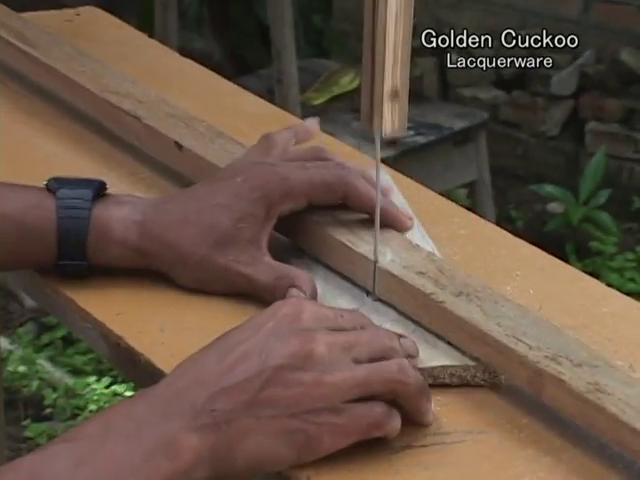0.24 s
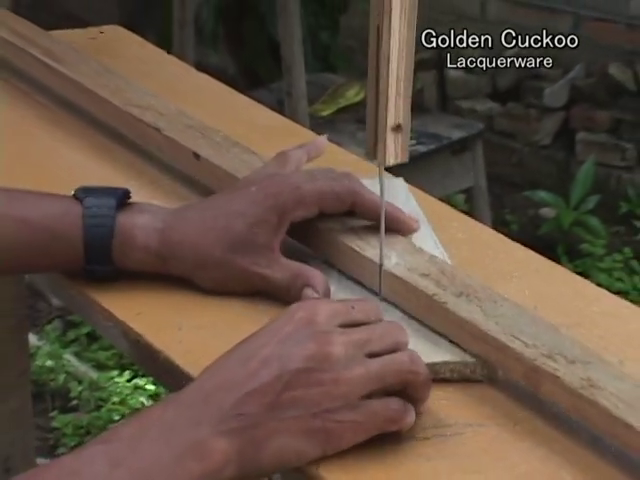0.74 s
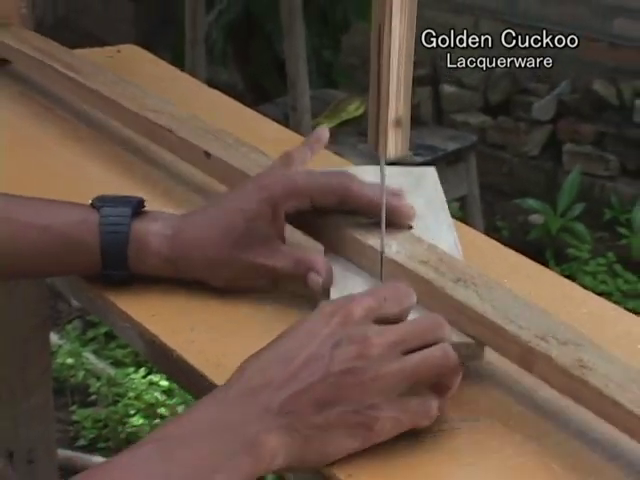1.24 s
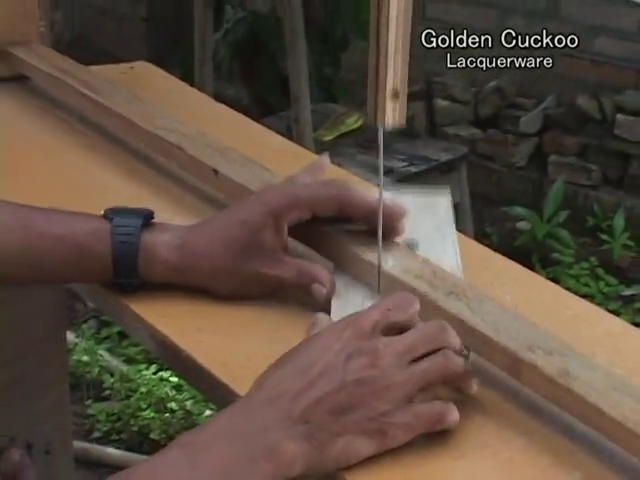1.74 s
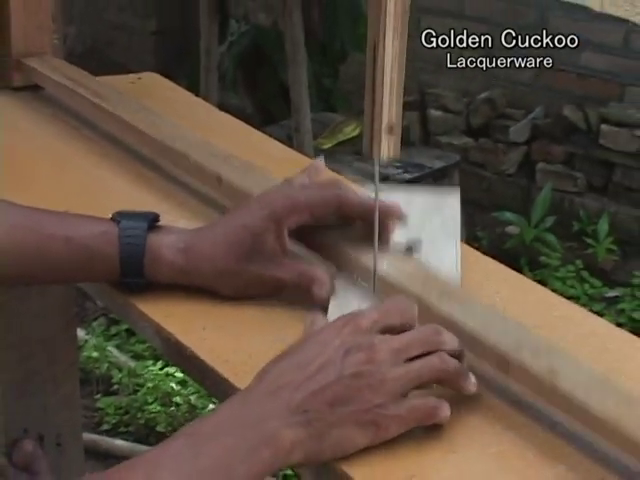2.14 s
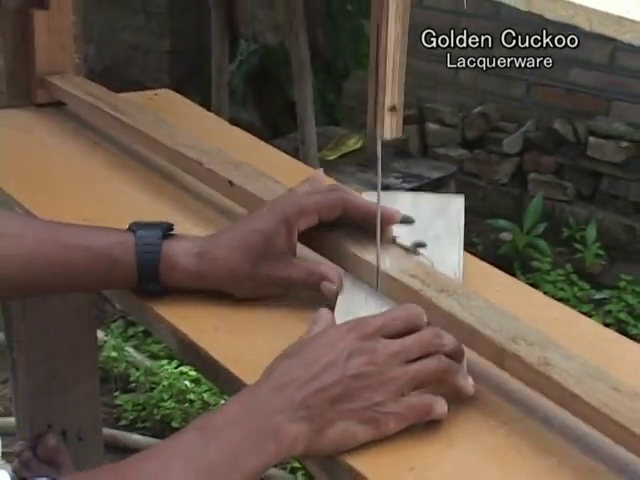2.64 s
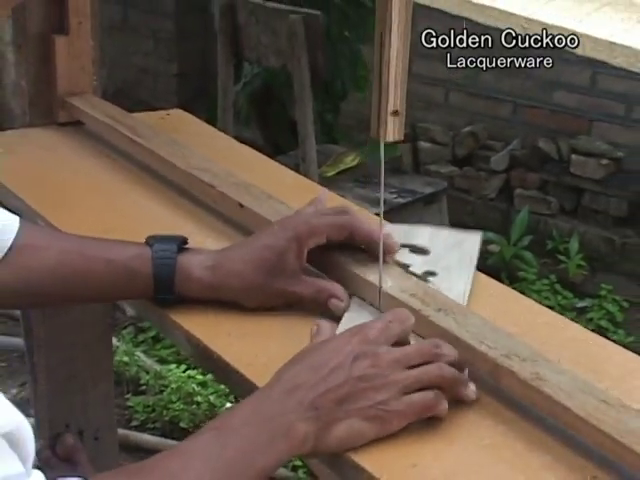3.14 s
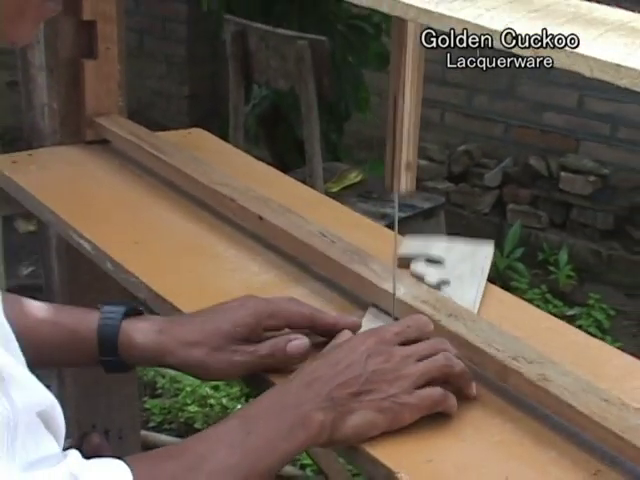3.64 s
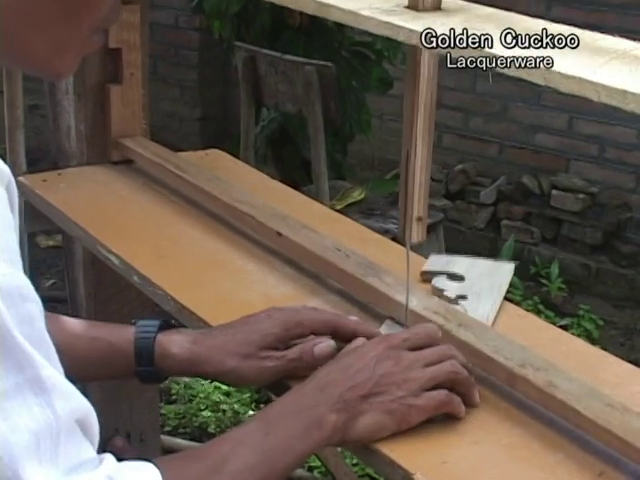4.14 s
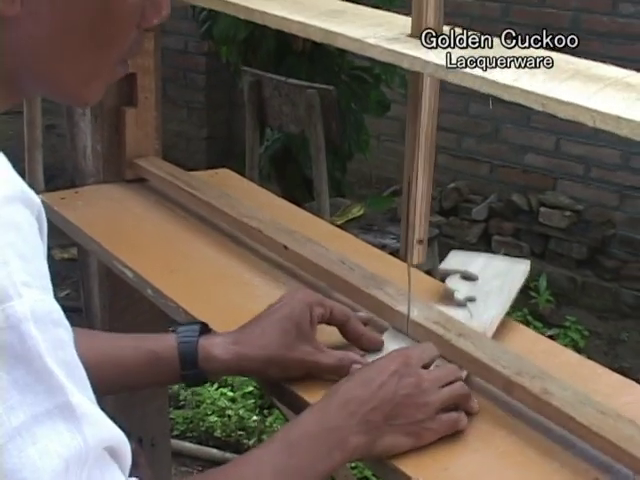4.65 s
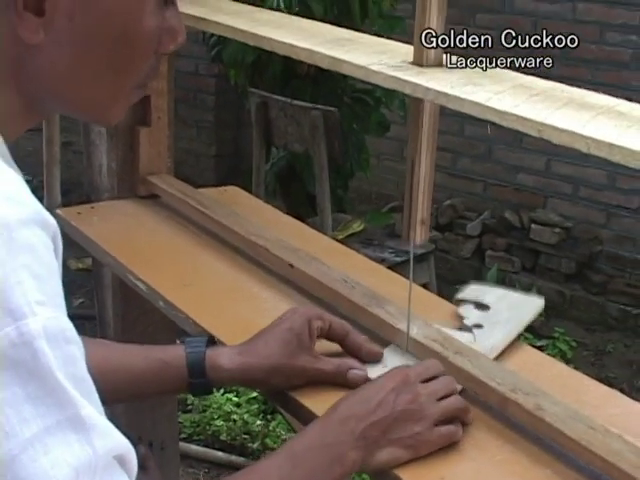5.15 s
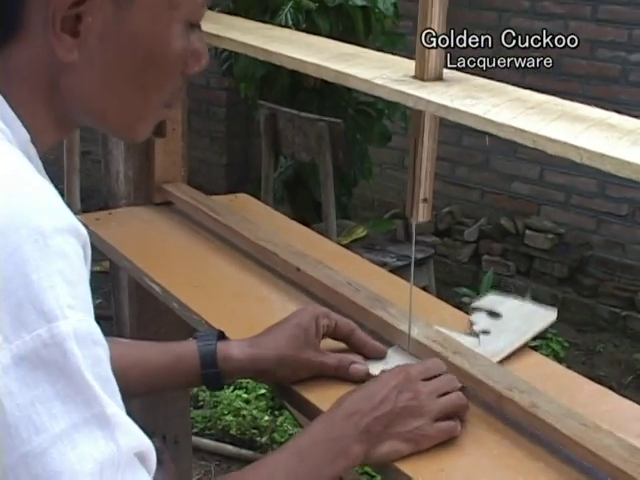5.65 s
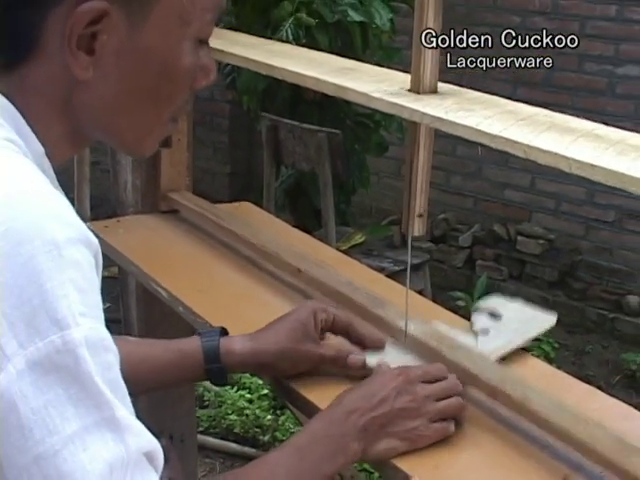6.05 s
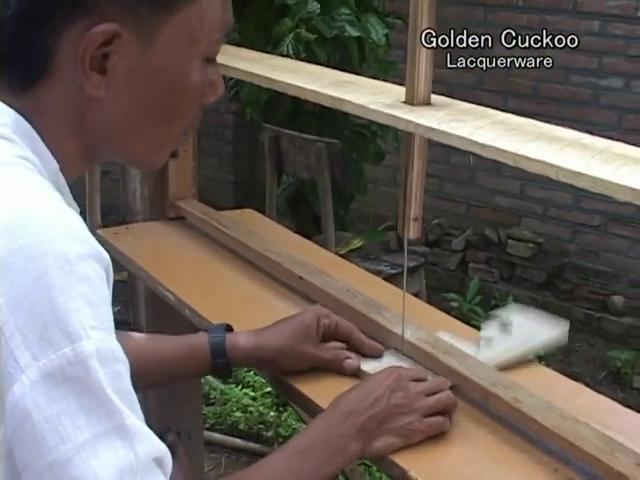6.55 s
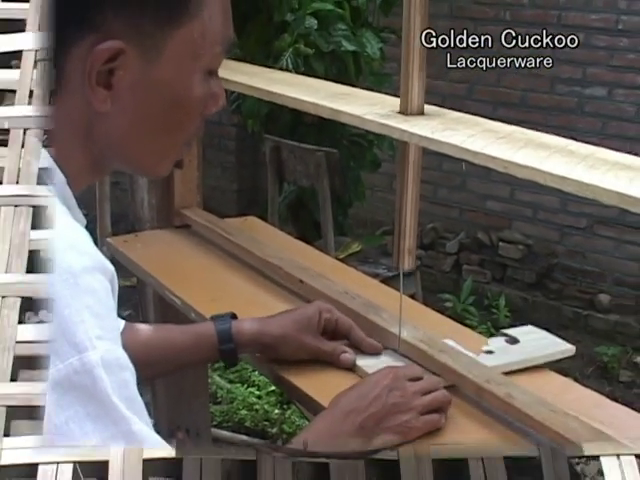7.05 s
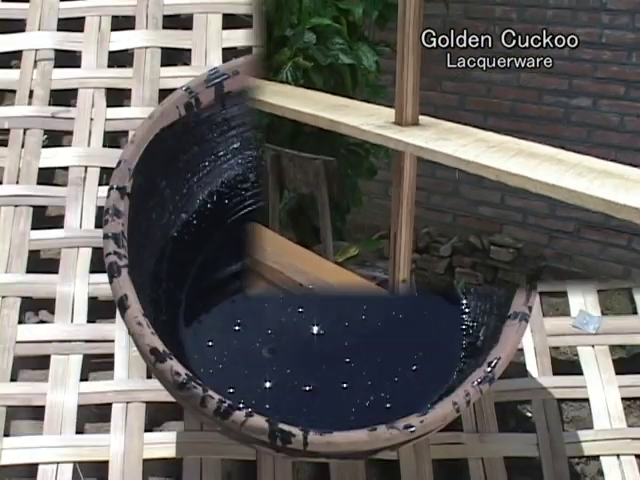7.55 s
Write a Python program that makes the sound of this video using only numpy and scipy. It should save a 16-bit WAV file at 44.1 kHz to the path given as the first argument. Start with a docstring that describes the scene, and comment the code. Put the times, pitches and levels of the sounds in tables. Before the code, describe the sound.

A slow rhythmic saw, over two strokes a second, grinds through thin wood outdoors while the loose board knocks and rattles on its table.

```python
"""Open yard: a wooden treadle scroll saw cuts a thin board close by, 2.4 strokes a second.
Down strokes: random tooth snaps, shaped by blade speed and feed, drive board, table and blade resonances.
Up strokes: friction noise slides lightly and swells in two rubs. Knocks: the lifted board clacks on the hold-down
bar or drops on the table, as noise cracks, decaying wood modes and thuds. Snags twang the blade; one squeak.
Behind: short scattered reflections, filtered yard noise and low air rumble, with a faint stereo spread."""
import sys
import numpy as np
from scipy import signal
from scipy.fft import rfft, irfft
from scipy.io import wavfile
from scipy.ndimage import uniform_filter1d, minimum_filter1d, map_coordinates

SR = 44100
rng = np.random.default_rng(int(sys.argv[2]) if len(sys.argv) > 2 else 0)


def unload_audio(sound):
    """Save the sound as a 16-bit wav file, at the path given as the first command line argument."""
    columns = np.transpose(np.atleast_2d(sound))
    # keep every value between -1 and 1, then stretch to whole-number steps
    steps = np.round(np.clip(columns, -1, 1) * 32767)
    wavfile.write(sys.argv[1], SR, steps.astype(np.int16))


N = 343873
T = np.arange(N) / SR  # s

# Down strokes: start_s, rise_s, force_db (relative)
DOWN_STROKES = [(.026, 0.014, -28.5), (.452, 0.012, -26), (0.88, 0.017, -26.5), (1.306, 0.0076, -25),
                (1.743, 0.039, -22.5), (2.173, 0.041, -22.5), (2.611, 0.024, -23), (3.03, 0.037, -24.5),
                (3.447, 0.057, -25.5), (3.885, 0.03, -27.5), (4.302, 0.072, -25.5), (4.75, 0.028, -28.5),
                (5.173, 0.022, -28), (5.58, 0.048, -26.5), (5.974, 0.067, -28), (6.4, 0.069, -27),
                (6.835, 0.047, -28), (7.254, 0.03, -31), (7.7, .025, -33.5)]
# Up strokes: first_rub_s, rub_spread_s (Gaussian sigma), sway_s (delay to second rub), force_db (relative)
UP_STROKES = [(0.283, 0.024, 0.071, -26), (.738, 0.014, 0.077, -23.5), (1.15, 0.015, .092, -22.5),
              (1.586, 0.015, 0.092, -23), (2.022, 0.011, 0.1, -20), (2.46, 0.016, .1, -22.5),
              (2.885, 0.022, 0.099, -25), (3.297, 0.019, 0.063, -26.5), (3.716, 0.015, 0.077, -25),
              (4.143, 0.021, .091, -28), (4.577, .019, 0.088, -26.5), (5.01, .016, 0.084, -25.5),
              (5.432, 0.021, 0.084, -25), (5.841, .014, 0.099, -21.5), (6.263, 0.013, 0.089, -22.5),
              (6.676, 0.0098, 0.085, -25.5), (7.111, .011, 0.09, -27.5), (7.539, 0.01, 0.075, -26.5)]
# Board knocks, bright clacks on the bar, dull drops on the table:
# start_s, strength_db (relative), table_thud_db (relative)
BOARD_KNOCKS = [(.2312, -17.5, -44), (0.241, -22.5, -46), (0.685, -40, -42), (1.085, -30.5, -36.5),
                (2.066, -36.5, -48), (2.512, -31, -42), (2.8276, -26, -36.5), (3.247, -20.5, -47),
                (3.373, -58, -25.5), (3.6618, -20, -39), (4.0966, -14.5, -41), (4.148, -30, -25),
                (4.1941, -11.5, -33), (4.235, -15, -18.5), (4.5264, -25.5, -45), (4.6236, -7, -38),
                (4.6336, -16, -33), (4.715, -51, -35), (4.9628, -14, -39), (5.05, -29.5, -39),
                (5.138, -52, -31.5), (5.3836, -15.5, -36), (5.793, -33.5, -32), (5.8776, -24.5, -29),
                (6.2105, -15, -34.5), (6.624, -24.5, -33.5), (7.0537, -15, -34), (7.585, -26, -54)]
# Tooth snags: start_s, strength_db (relative)
TOOTH_SNAGS = [(0.462, -22.5), (0.4645, -12.5), (.504, -21), (0.5339, -17.5), (.8939, -19), (1.325, -27),
               (1.7606, -27.5), (1.785, -20), (1.8216, -22), (2.1978, -14.5), (2.2434, -19.5),
               (2.2767, -17), (2.2894, -17), (2.313, -24), (2.3413, -16.5), (2.629, -13), (3.0554, -16.5),
               (3.9326, -19)]
# Stick-slip squeak: centre_s, spread_s (Gaussian sigma), pitch_hz, level_db
STICK_SLIP = (5.342, .008, 3650, -35)
# Blade seat in the kerf as the board is turned: time_s, low_modes_db, side_whine_db, rub_hiss_db
KERF_SEAT = [(0, -6, -47, -25), (1.1, -3.5, -56, -13), (2.3, -2, -66, -32), (3.3, -6, -22, -10.5),
             (4.4, -10, -11.5, -9), (5.25, -21, -4.5, -8.5), (6.1, -6, -9, -10.5), (6.9, -2.5, 0, 3.5),
             (7.8, -1.5, -1, -5.5)]
# Board slackness; one hand lets go of the far end: time_s, slack (0-1)
BOARD_SLACK = [(0, 0.04), (.5, 0), (3.05, 0.14), (3.45, 1), (5.9, 0.64), (7.8, 0.56)]
# Table and board resonances: centre_hz, width_hz, boost_db
TABLE_PEAKS = [(243, 14, 7.5), (363.8, 46, 8), (415, 110, -4.5), (508, 29.6, 6), (655, 990, 5.5),
               (764, 80, -6.5), (843, 45, 8), (1054, 72, 2.5), (1240, 68, -1.5), (1463, 130, 6.5),
               (1767, 58, 6), (1980, 280, 4), (2250, 41, 3.5), (2690, 210, 12.5), (4350, 560, -0.5),
               (6270, 700, 22), (7970, 180, 23.5), (9760, 220, 17), (11330, 1700, 9.5), (13300, 270, 2)]
# Steel blade modes: centre_hz, width_hz, peak_db (relative)
BLADE_MODES = [(850, 50, -2), (2660, 190, 0), (2800, 150, -8), (4030, 220, -10), (5000, 300, -15),
               (12000, 250, -23), (13340, 200, -18)]
# Sideways modes of the blade twisted in the kerf: centre_hz, width_hz, peak_db (relative)
WHINE_MODES = [(1053, 41, 11), (4627, 86, 6), (5780, 290, -6)]
# Modes of struck board and bar: centre_hz, level_db (relative), t60_s
WOOD_MODES = [(878, -10.5, 0.072), (1121, -3.5, 0.055), (1345, -4.5, 0.053), (1472, -1, 0.044),
              (1632, 8, 0.024), (1844, 1.5, 0.039), (2073, 2.5, 0.043), (2390, 2, 0.036),
              (2670, 8.5, 0.013), (2875, 7, 0.022), (3200, -4, 0.033), (3600, -32, 0.0091),
              (3920, -8.5, 0.02), (4450, -19, 0.0083)]
# Spectra, all: frequency_hz, level_db (relative)
# Board pressed on the table
PRESSED_BOARD_COLOUR = [(20, -39), (70, -30.5), (135, -19.5), (170, -23), (215, -13), (260, -0.5), (350, 3),
                        (550, 2.5), (800, -6), (1100, -11), (1700, -13), (3000, -44.5), (8000, -43.5)]
# Board still loose
LOOSE_BOARD_COLOUR = [(60, -57), (180, -16), (300, 1.5), (600, 2), (850, 6.5), (1500, -10.5), (3000, -30),
                      (8000, -72)]
# Table under a light touch
LIGHT_TOUCH_COLOUR = [(20, -39), (70, -48), (140, -29), (200, -23.5), (280, 1.5), (360, -0.5), (600, 0),
                      (1000, 0), (1600, -7), (3000, -23.5), (8000, -61)]
# Teeth tearing wood
RASP_COLOUR = [(60, -65), (300, -28), (900, 3.5), (1500, -1.5), (2700, 4.5), (3500, 1), (4900, 0),
               (5700, -17), (7000, -37.5), (9000, -25.5), (13500, -12.5), (15500, -73)]
# Backs of the teeth rubbing
SCRAPE_COLOUR = [(60, -55), (250, -14), (700, -4), (1000, 5.5), (1400, 1.5), (2700, 6.5), (3600, 2),
                 (5000, -1), (6300, -44), (8000, -47), (13500, -10), (15500, -30)]
# Bright part of the rubs
HISS_COLOUR = [(200, -45), (2000, 4), (4500, 8.5), (5700, 2), (6400, -14), (7200, -19), (11000, -8),
               (14000, -13), (15500, -27)]
# Hard knock
CRACK_COLOUR = [(60, -49), (300, -41), (1200, -4), (2000, 1.5), (3100, 2.5), (4200, 2.5), (4900, -2.5),
                (5600, -17), (6300, -13), (7300, -27), (9000, -30), (11500, -16.5), (13500, -15),
                (15500, -34)]
# Yard background
YARD_COLOUR = [(20, 0), (40, -25), (80, -16.5), (140, -11.5), (170, -11), (300, 9.5), (500, -2.5),
               (1000, 0), (2700, -12.5), (6000, -12.5), (8000, -22), (13500, -22), (16000, -30)]
# Air moving over the microphones
RUMBLE_COLOUR = [(15, -12), (35, 29), (60, -25), (120, -32), (400, -60)]
# Colour of the faint side signal
SIDE_COLOUR_POINTS = [(300, -70), (1000, -58), (2000, 2), (5000, 14.5), (13000, 24)]
# Faint low-weighted noise in the side signal
SIDE_NOISE_COLOUR = [(20, 3), (60, -4), (150, -19), (1000, -27), (15000, -13)]

CUT_S, FALL_S = 0.21, 0.081  # down stroke, slowing at its bottom
SAG_DB, SLACK_SAG_DB = 6.5, 2  # feed fade over a stroke: board pressed down, board slack
RASP_DB, RASP_SLOPE, SLACK_RASP_DB = -32, 0.7, 3  # middling stroke, dB per dB of force, extra when slack
RUB_SPREAD_S, SWAY_LOSS_DB, SWAY_SHORTER = 0.016, 4.5, 0.74  # usual rub; second is weaker and shorter
RUB_BOARD_DB, SLACK_BOARD_DB = -40, 11.5  # board shake per rub, extra when slack
RING_DB, RING_SLOPE = -20.5, 0.41  # ring at 0 dB strength, dB per dB: harder blows crack more than they ring
TAP_DB, TAP_SPREAD_DB, TAP_THUD_DB = -53, 3, -44.5  # board settling between rubs
LAND_RISE_SHARE, LAND_DB, LAND_THUD_DB = 0.35, -20.5, -8  # board landing; levels relative to stroke force


def cutting(bite=1.19, judder_db=2, chatter_db=0.5, rasp_gain_db=-1, blade_gain_db=-2, entry_s=0.036, size=16000):
    """Down strokes: teeth bite, the board judders on the table, the rasp dies first as the blade slows."""
    out, on_blade, t = np.zeros(N), np.zeros(N), T[:size]
    judder = undb(judder_db * walk(70))
    chatter = undb(chatter_db * walk(260))
    tearing = np.pad(snaps(rate_hz=2000, scatter_db=2) * judder * chatter, (0, size))
    knocking = np.pad(snaps(rate_hz=800, scatter_db=1) * judder, (0, size))
    usual_db = np.mean(DOWN_STROKES, axis=0)[2]
    for start_s, rise_s, force_db in DOWN_STROKES:
        i = max(int(start_s * SR), 0)
        peaks = held()
        loose_hold = slack(start_s)
        sag_db = SAG_DB + (SLACK_SAG_DB - SAG_DB) * loose_hold
        edge_db = RASP_DB + RASP_SLOPE * (force_db - usual_db) + SLACK_RASP_DB * loose_hold
        rise = np.clip(t / max(rise_s, 0.004), 0, 1)
        fall = np.clip((CUT_S - t) / FALL_S, 0, 1) ** 1.28
        speed = rise * fall
        feed = undb(-sag_db * (np.clip(t / CUT_S, 0, 1) - 0.5))
        load = knocking[i:i + size] * undb(force_db) * speed * feed
        rasp = tearing[i:i + size] * undb(edge_db) * speed ** bite * np.sqrt(feed)
        # high rattle while loose, deeper once the teeth have pulled the board onto the table
        loose = np.exp(-(t / entry_s) ** 2)
        add(out, start_s, through(load * loose, response(LOOSE_BOARD_COLOUR, peaks)))
        add(out, start_s, through(load * np.sqrt(1 - loose), response(PRESSED_BOARD_COLOUR, peaks)))
        add(out, start_s, undb(rasp_gain_db) * through(rasp, response(RASP_COLOUR, peaks)))
        add(on_blade, start_s, rasp)
    return out + undb(blade_gain_db) * blade(on_blade)


def held(spread_db=2.28, detune=0.01):
    """Resonances for one stroke: the hands turn the board and damp it differently every time."""
    hz, width_hz, boost_db = np.transpose(TABLE_PEAKS)
    shift, lift = rng.standard_normal((2, len(TABLE_PEAKS)))
    return np.transpose([hz * (1 + detune * shift), width_hz, boost_db + spread_db * lift])


def slack(time_s):
    """Board slackness, 0-1, interpolated in time."""
    return np.interp(time_s, *np.transpose(BOARD_SLACK))


def returning(lag_s=0.015, linger=0.75, slide_db=-42, slide_board_db=-45,
              scrape_gain_db=-4, hiss_gain_db=-1, hiss_loss=0.33, blade_gain_db=-4):
    """Up strokes: tooth backs slide lightly and rub twice as the blade sways against the kerf."""
    slide = np.zeros(N)
    for (start_s, *_), (next_s, *_) in zip(DOWN_STROKES, DOWN_STROKES[1:]):
        turn_s = start_s + CUT_S
        slide += np.sin(np.pi * np.clip((T - turn_s) / (next_s - turn_s), 0, 1))
    scrape = undb(slide_db) * slide
    board = undb(slide_board_db) * slide
    hiss = np.zeros(N)
    seat_s, _, _, bright_db = np.transpose(KERF_SEAT)
    for first_s, spread_s, sway_s, force_db in UP_STROKES:
        # a short first rub leaves little sway for the second
        spent_db = SWAY_LOSS_DB * (RUB_SPREAD_S / spread_s) ** 2
        rubs = [(first_s, spread_s, 0), (first_s + sway_s, SWAY_SHORTER * spread_s, spent_db)]
        for rub_s, width_s, loss_db in rubs:
            press = swell(rub_s, width_s)
            scrape = np.maximum(scrape, undb(force_db - loss_db) * press)
            rub_hiss_db = force_db - hiss_loss * loss_db + np.interp(rub_s, seat_s, bright_db)
            hiss += undb(rub_hiss_db) * press
            # the heavy table answers later
            shake_db = RUB_BOARD_DB + SLACK_BOARD_DB * slack(rub_s)
            board = np.maximum(board, undb(shake_db) * swell(rub_s + lag_s, linger * width_s))
    catch = undb(1.9 * walk(260))
    friction = snaps(rate_hz=9000, scatter_db=4) * catch * scrape
    bright = snaps(rate_hz=12000, scatter_db=2) * catch * hiss
    shaking = snaps(rate_hz=2500, scatter_db=0.5) * board
    return (undb(scrape_gain_db) * through(friction, response(SCRAPE_COLOUR, TABLE_PEAKS))
            + undb(blade_gain_db) * blade(friction)
            + undb(hiss_gain_db) * through(bright, response(HISS_COLOUR, TABLE_PEAKS))
            + through(shaking, response(LIGHT_TOUCH_COLOUR, TABLE_PEAKS)))


def board_knocks(crack_gain_db=23, ring_gain_db=32, thud_gain_db=29, spread_db=3, build_s=0.0019, size=6000):
    """The lifted board clacks on the bar or drops on the table: crack, short wooden ring, table thud."""
    out, t = np.zeros(N), T[:size]
    crack, table = response(CRACK_COLOUR), response(LIGHT_TOUCH_COLOUR, TABLE_PEAKS)
    hz, mode_db, t60_s = np.transpose(WOOD_MODES)[:, :, None]
    # low bending waves travel slowly and build up late: each knock falls in pitch
    build = 1 - np.exp(-(t / build_s * hz / np.median(hz)) ** 2)
    for start_s, hit_db, low_db in [*BOARD_KNOCKS, *taps()]:
        # each blow lands on another spot and weights the modes anew
        weight, detune, phase = rng.standard_normal((3, len(WOOD_MODES), 1))
        decay = undb(mode_db + spread_db * weight - 60 * t / t60_s)
        tones = np.sin(2 * np.pi * (hz * (1 + 0.029 * detune) * t + phase))
        ring = (decay * tones * build).sum(axis=0)
        ring_db = RING_DB + RING_SLOPE * hit_db + ring_gain_db
        add(out, start_s, undb(ring_db) * ring / np.linalg.norm(ring))
        snap = signal.fftconvolve(contact(decay_s=0.0035), crack)
        add(out, start_s, undb(hit_db + crack_gain_db) * snap)
        thud = signal.fftconvolve(contact(decay_s=0.0087), table)
        add(out, start_s, undb(low_db + thud_gain_db) * thud)
    return out


def taps():
    """Light knocks as the teeth pull the board down and midway between rubs; rows as BOARD_KNOCKS."""
    luck_db = TAP_SPREAD_DB * rng.standard_normal(len(UP_STROKES))
    settling = [(first_s + sway_s / 2, TAP_DB + db, TAP_THUD_DB + db)
                for (first_s, _, sway_s, _), db in zip(UP_STROKES, luck_db)]
    landing = [(start_s + LAND_RISE_SHARE * rise_s, db + LAND_DB, db + LAND_THUD_DB)
               for start_s, rise_s, db in DOWN_STROKES]
    return settling + landing


def snags(twang_gain_db=21, crack_gain_db=18, thud_gain_db=22):
    """A tooth catches and lets go: the blade twangs, the board slaps the table."""
    twang, slap = np.zeros(N), np.zeros(N)
    for start_s, hit_db in TOOTH_SNAGS:
        add(twang, start_s, undb(hit_db) * contact(decay_s=0.0033))
        add(slap, start_s, undb(hit_db) * contact(decay_s=0.0073))
    return (undb(twang_gain_db) * blade(twang)
            + undb(crack_gain_db) * through(twang, response(CRACK_COLOUR))
            + undb(thud_gain_db) * through(slap, response(LIGHT_TOUCH_COLOUR, TABLE_PEAKS)))


def blade(force, sway_s=0.000293):
    """Blade ring under a force, low and sideways modes balanced by its seat in the kerf."""
    seat_s, low_db, side_db, _ = np.transpose(KERF_SEAT)
    low = through(force * undb(np.interp(T, seat_s, low_db)), blade_response(BLADE_MODES))
    whine = through(force * undb(np.interp(T, seat_s, side_db)), blade_response(WHINE_MODES))
    # tension changes as it is dragged through the wood: wandering delay bends the modes
    return map_coordinates(low + whine, [(T + sway_s * walk(25)) * SR], order=3)


def blade_response(modes, size=4096):
    """Unit-energy ring of the tensioned blade: decaying modes, damped by the wood around it."""
    t = T[:size]
    h = np.zeros(size)
    for hz, width_hz, db in modes:
        h += undb(db) * width_hz * np.exp(-np.pi * width_hz * t) * np.cos(2 * np.pi * hz * t)
    # so thin a blade radiates little bass
    h = signal.sosfilt(signal.butter(2, 500, "high", fs=SR, output="sos"), h)
    return h / np.linalg.norm(h)


def squeak(waver=0.015):
    """Stick-slip of the blade as it stops: a short tone of unsteady pitch."""
    centre_s, spread_s, hz, db = STICK_SLIP
    pitch_hz = hz * (1 + waver * walk(240))
    tone = unit(np.sin(2 * np.pi * np.cumsum(pitch_hz) / SR))
    return undb(db) * swell(centre_s, spread_s) * tone


def surroundings(x, t60_s=0.13, size=16000):
    """Short scatter off saw frame and yard wall: decaying noise tail, duller toward the top."""
    t = T[:size]
    tail = rng.standard_normal(size) * undb(-60 * t / t60_s) * (1 - np.exp(-t / 0.0058))
    tail = through(tail, response([(100, 1.5), (300, 0), (2500, -5), (6000, -5.5), (15000, -13.5)]))
    return through(x, tail / np.linalg.norm(tail))


def yard_noise(level_db=-49, drift_db=1.3):
    """Yard background: coloured noise with slow level drift."""
    return undb(level_db + drift_db * walk(7.2)) * through(rng.standard_normal(N), response(YARD_COLOUR))


def air_rumble(level_db=-75, gust_db=5):
    """Air moving over the microphones: low noise in gusts."""
    return undb(level_db + gust_db * walk(3.4)) * through(rng.standard_normal(N), response(RUMBLE_COLOUR))


def stereo_spread(mid, side_db=-20, noise_db=-71):
    """Faint side signal: scattered sound, mainly treble, plus low-weighted noise."""
    side = undb(side_db) * through(surroundings(mid, t60_s=0.035), response(SIDE_COLOUR_POINTS))
    return side + undb(noise_db) * through(rng.standard_normal(N), response(SIDE_NOISE_COLOUR))


def snaps(rate_hz, scatter_db):
    """Dense random snaps of uneven size, as teeth break or rub wood fibres; rms 1."""
    hit = rng.random(N) < rate_hz / SR
    size = undb(scatter_db * np.clip(rng.standard_normal(N), -2, 2))
    return unit(hit * size * rng.choice([-1, 1], N))


def contact(decay_s, size=2048):
    """Brief decaying chatter of wood on wood, unit energy."""
    force = rng.choice([-1, 1], size) * np.exp(-T[:size] / decay_s)
    return force / np.linalg.norm(force)


def swell(centre_s, spread_s):
    """Gaussian press, peak 1."""
    out = np.zeros(N)
    first = max(int((centre_s - 5 * spread_s) * SR), 0)
    near = slice(first, int((centre_s + 5 * spread_s) * SR))
    out[near] = np.exp(-0.5 * ((T[near] - centre_s) / spread_s) ** 2)
    return out


def response(points, peaks=(), size=4096):
    """Minimum-phase impulse response, unit energy, from a smooth colour plus resonances."""
    f = np.maximum(np.fft.rfftfreq(size, 1 / SR), 1)
    hz, db = np.transpose(points)
    db = np.interp(np.log(f), np.log(hz), db)
    for centre_hz, width_hz, boost_db in peaks:
        db = db + boost_db / (1 + (2 * (f - centre_hz) / width_hz) ** 2)
    # fold the cepstrum to make it causal
    cepstrum = irfft(np.log(undb(db)))
    cepstrum[1:size // 2] *= 2
    cepstrum[size // 2 + 1:] = 0
    h = irfft(np.exp(rfft(cepstrum)))
    return h / np.linalg.norm(h)


def through(x, h):
    """Pass a force through a body: convolution, input length kept."""
    return signal.fftconvolve(x, h)[:len(x)]


def walk(rate_hz):
    """Random drift, linear between rate_hz knots a second, rms near 1."""
    knots = rng.standard_normal(N // 20)
    return 1.396 * np.interp(T * rate_hz, np.arange(len(knots)), knots)


def add(track, start_s, sound):
    """Mix a sound into a track."""
    i = max(int(start_s * SR), 0)
    track[i:i + len(sound)] += sound[:N - i]


def undb(db):
    """Decibels to amplitude."""
    return 10 ** (np.asarray(db) / 20)


def unit(x):
    """Scale to rms 1."""
    return x / np.sqrt(np.mean(x ** 2))


def scene(wet_db=-20):
    """Saw straight ahead in the yard, with a faint stereo spread, mainly in the treble."""
    saw = cutting() + returning() + board_knocks() + snags() + squeak()
    mid = saw + undb(wet_db) * surroundings(saw) + yard_noise() + air_rumble()
    side = stereo_spread(mid)
    return np.array([mid + side, mid - side]) * undb([[-0.07], [0.07]])


def record(dry, ceiling=1.0, top_hz=14600):
    """A limiter holds down the hardest peaks; an elliptic low-pass cuts the top."""
    wanted = np.minimum(1, ceiling / (np.abs(dry).max(axis=0) + 1e-9))
    gain = uniform_filter1d(minimum_filter1d(wanted, size=65), size=65)
    low_pass = signal.ellip(8, 0.2, 70, top_hz, fs=SR, output="sos")
    return signal.sosfilt(low_pass, dry * gain)


dry = scene()
out = record(dry)
unload_audio(out)
```